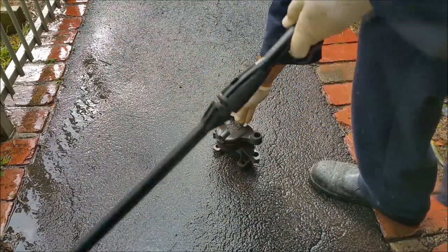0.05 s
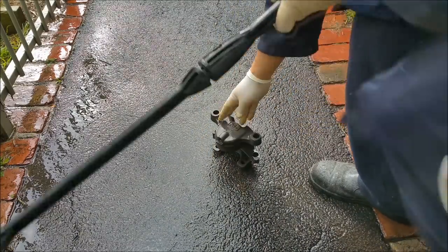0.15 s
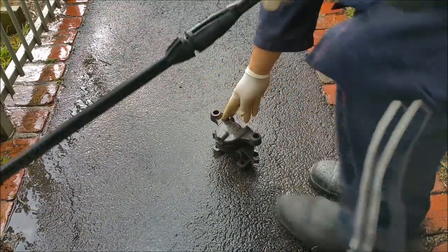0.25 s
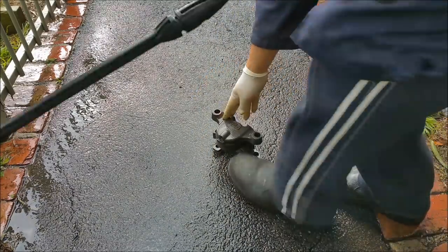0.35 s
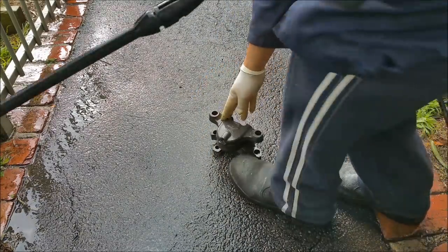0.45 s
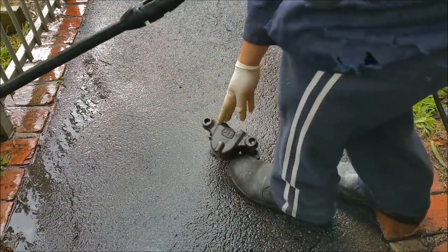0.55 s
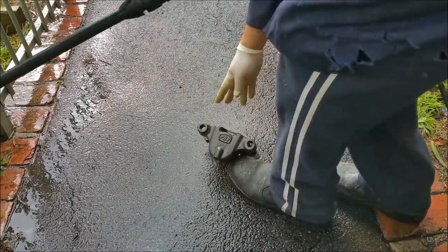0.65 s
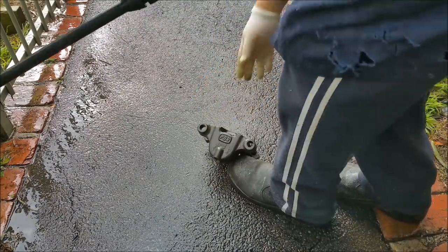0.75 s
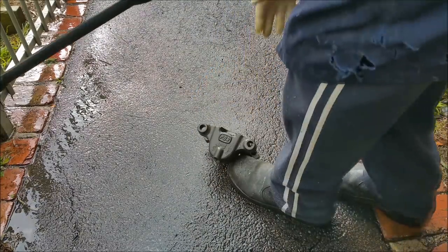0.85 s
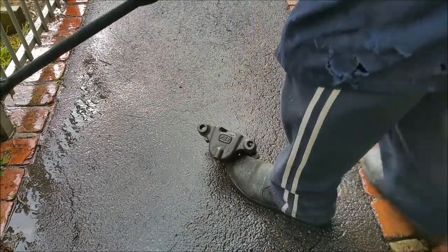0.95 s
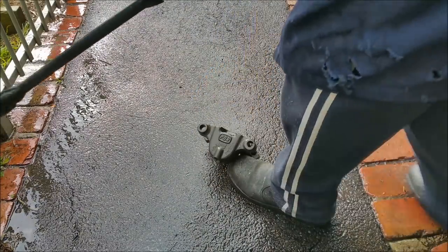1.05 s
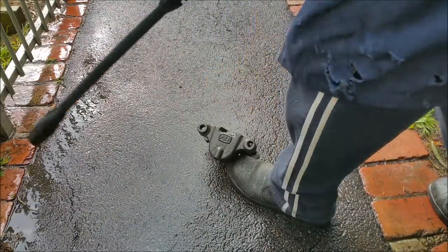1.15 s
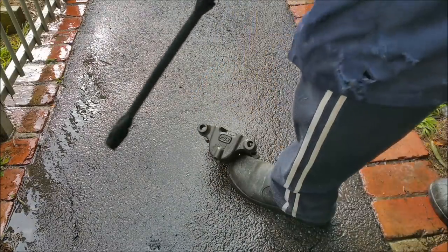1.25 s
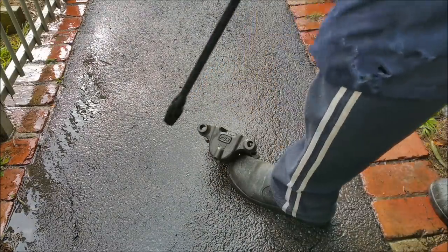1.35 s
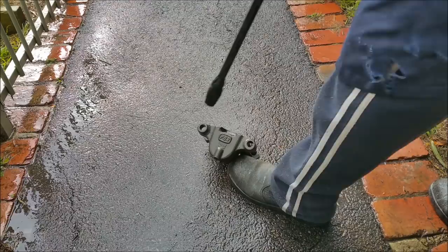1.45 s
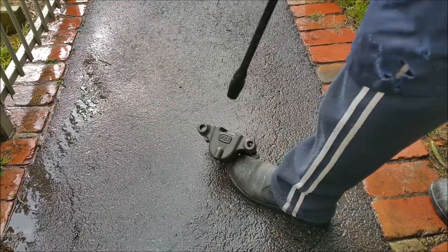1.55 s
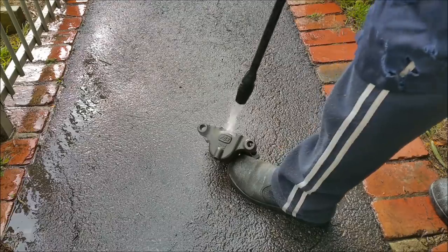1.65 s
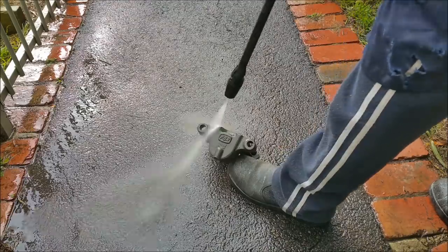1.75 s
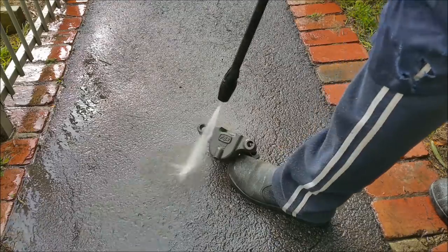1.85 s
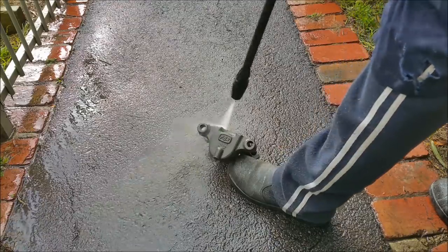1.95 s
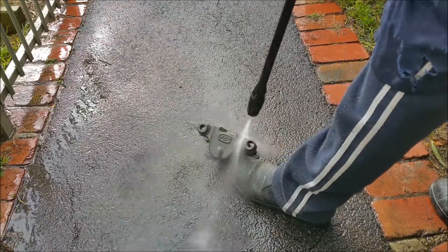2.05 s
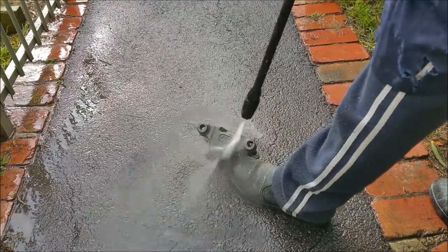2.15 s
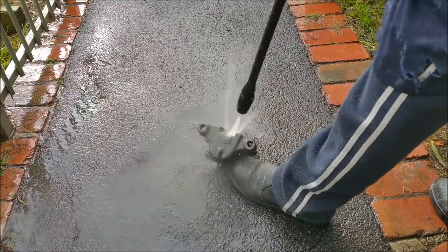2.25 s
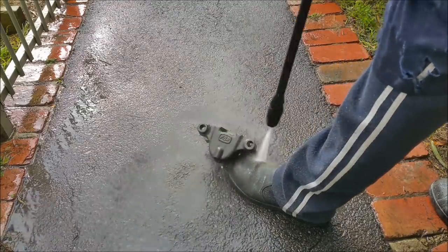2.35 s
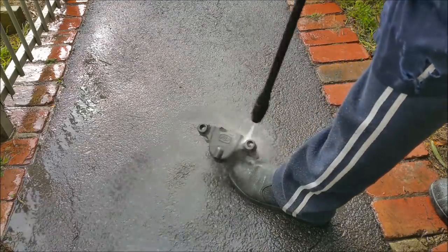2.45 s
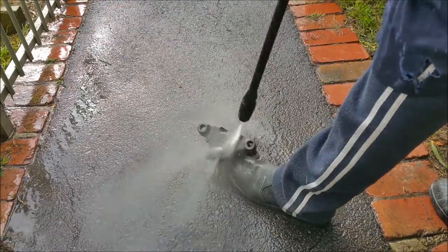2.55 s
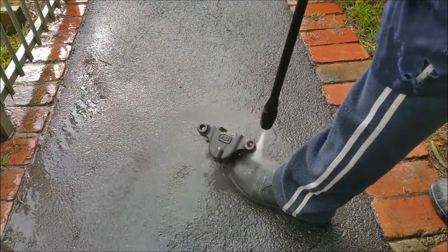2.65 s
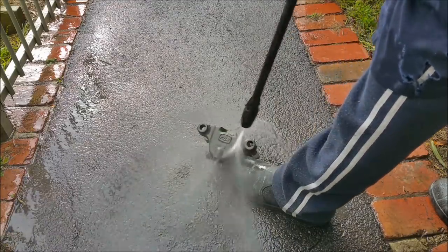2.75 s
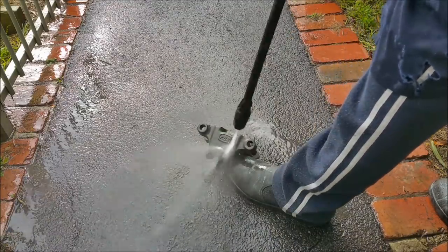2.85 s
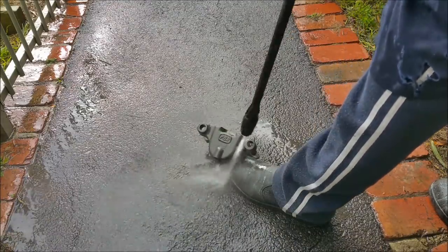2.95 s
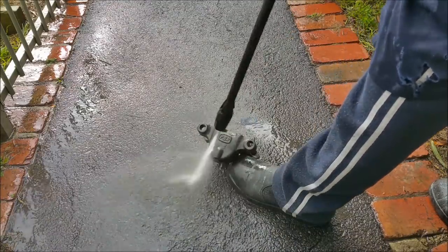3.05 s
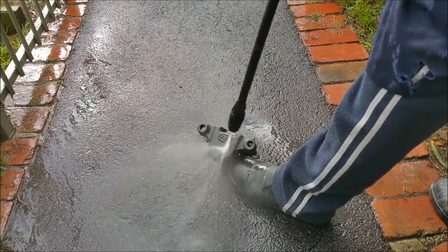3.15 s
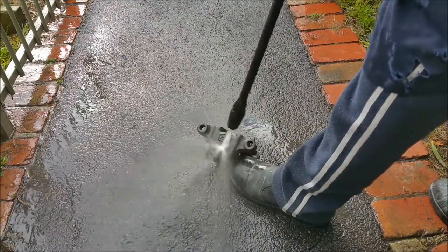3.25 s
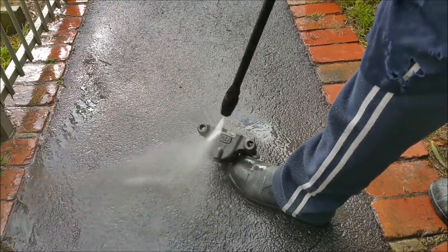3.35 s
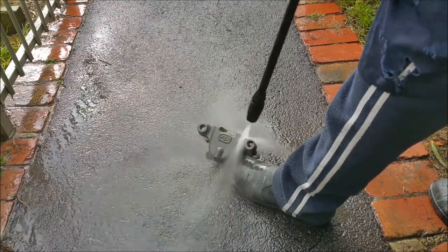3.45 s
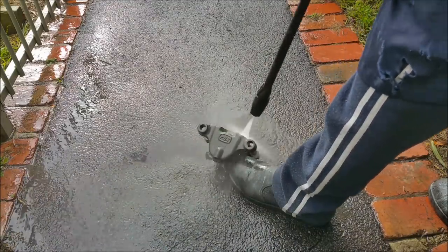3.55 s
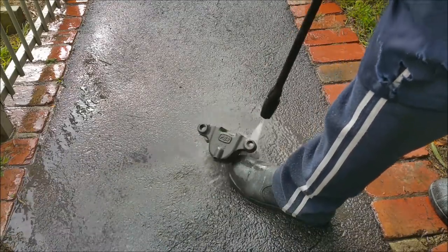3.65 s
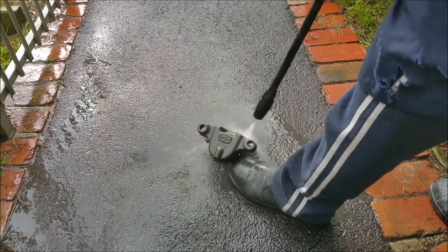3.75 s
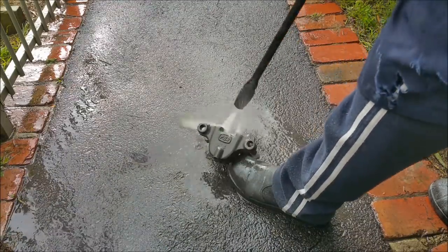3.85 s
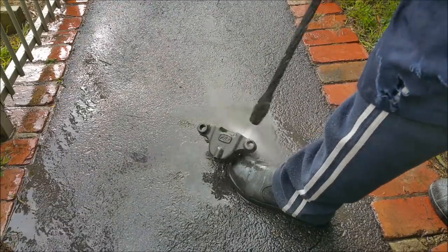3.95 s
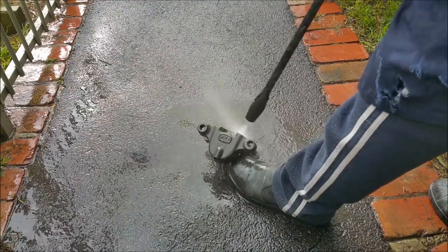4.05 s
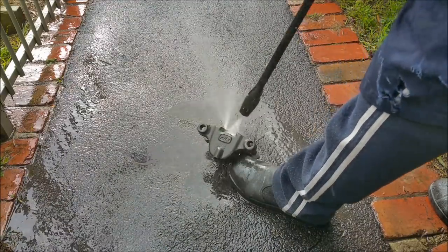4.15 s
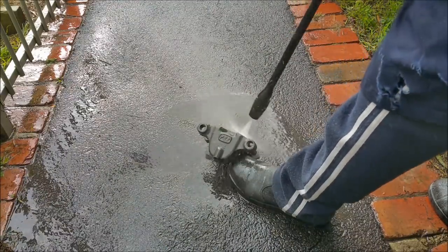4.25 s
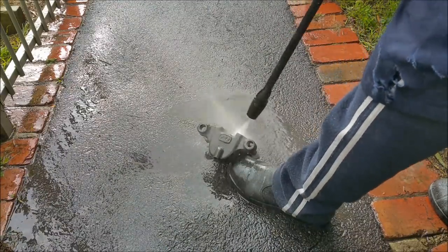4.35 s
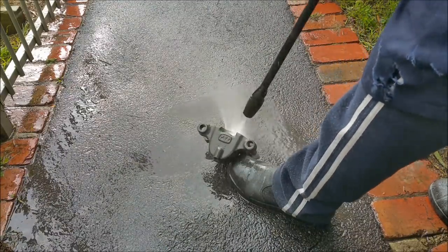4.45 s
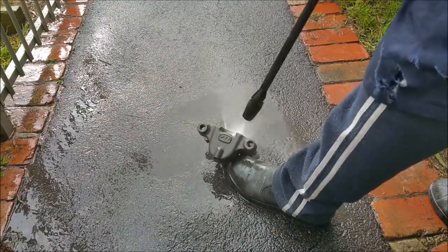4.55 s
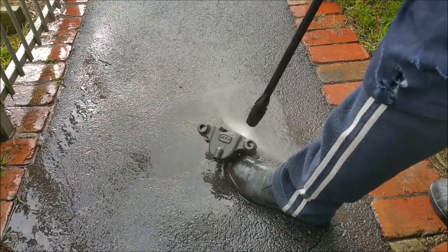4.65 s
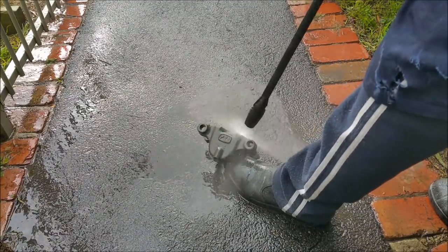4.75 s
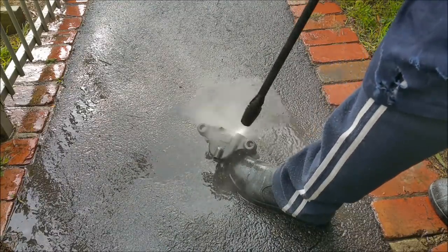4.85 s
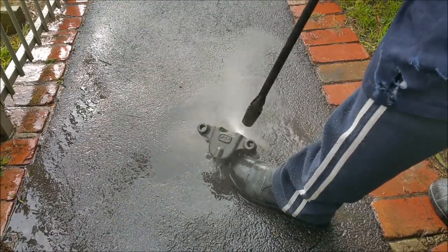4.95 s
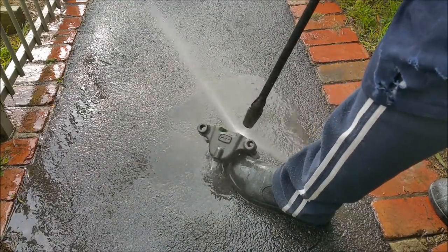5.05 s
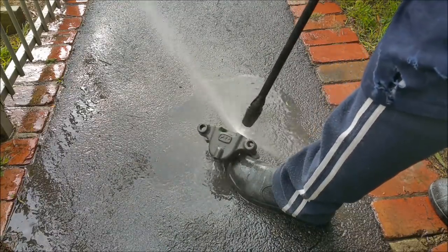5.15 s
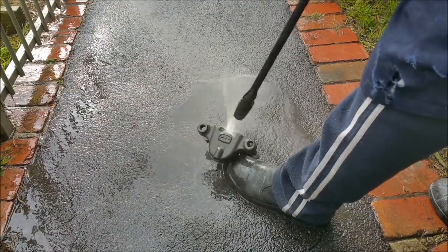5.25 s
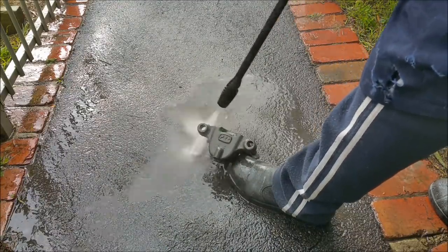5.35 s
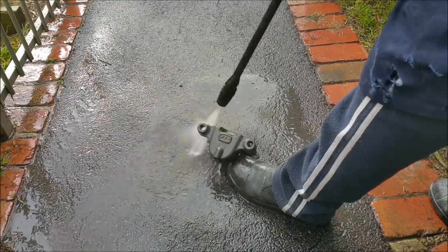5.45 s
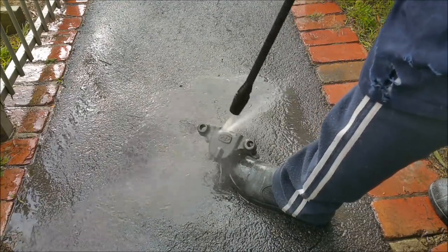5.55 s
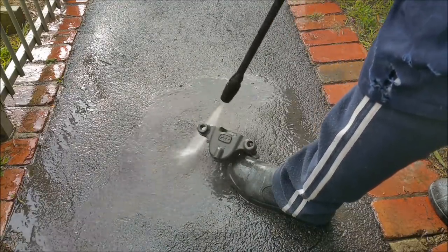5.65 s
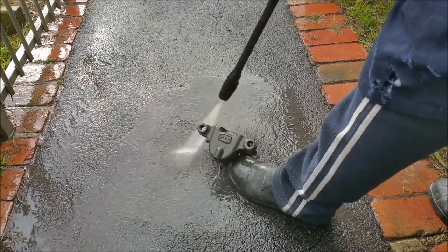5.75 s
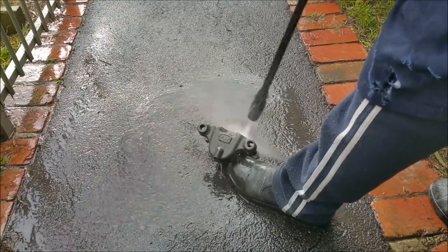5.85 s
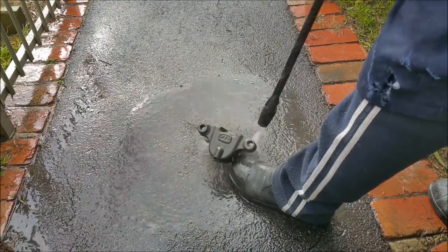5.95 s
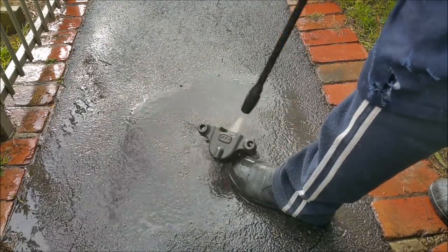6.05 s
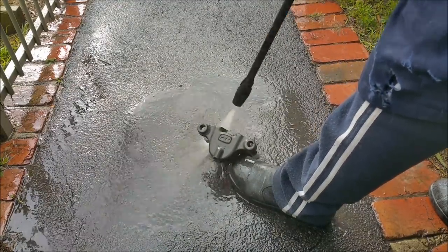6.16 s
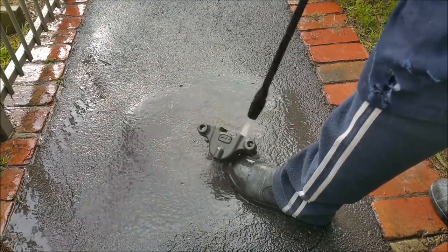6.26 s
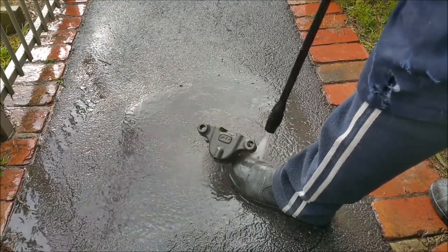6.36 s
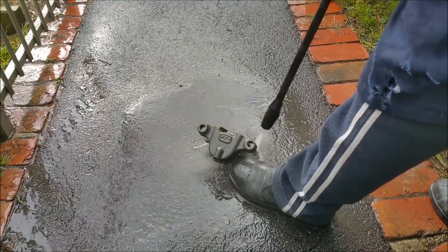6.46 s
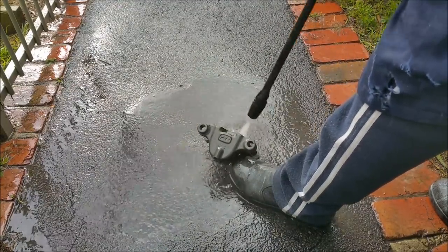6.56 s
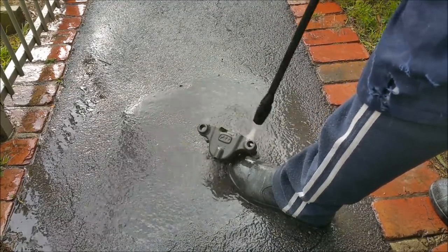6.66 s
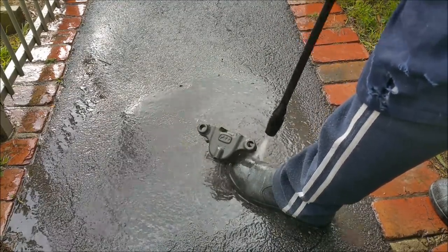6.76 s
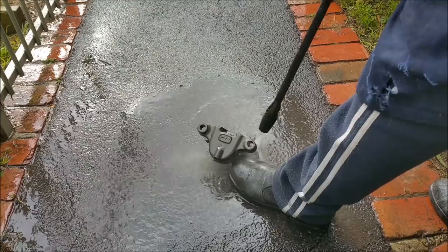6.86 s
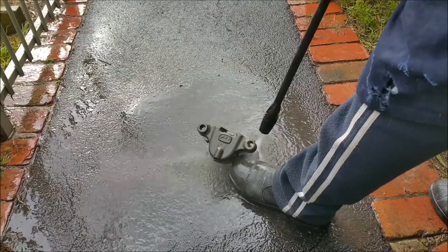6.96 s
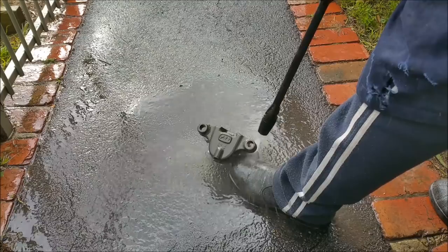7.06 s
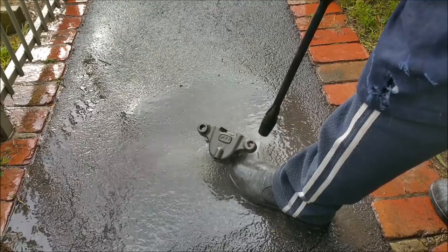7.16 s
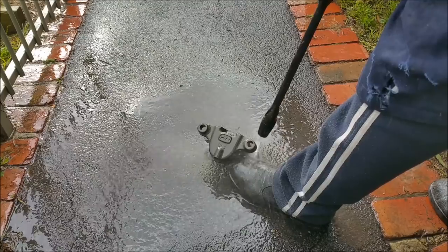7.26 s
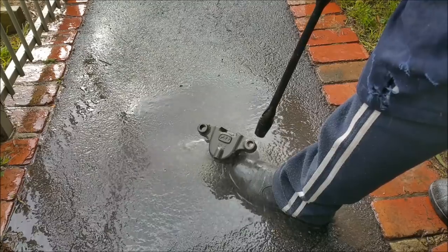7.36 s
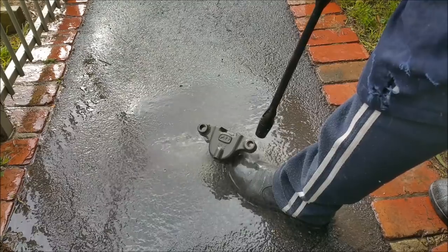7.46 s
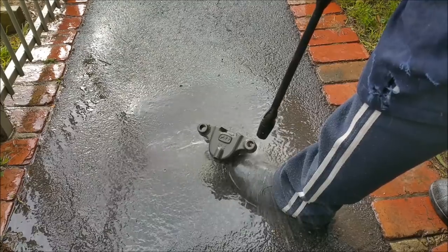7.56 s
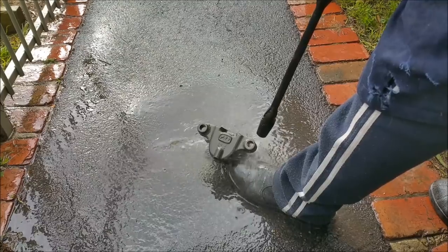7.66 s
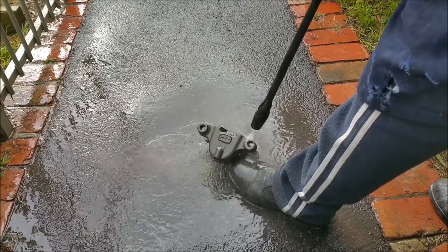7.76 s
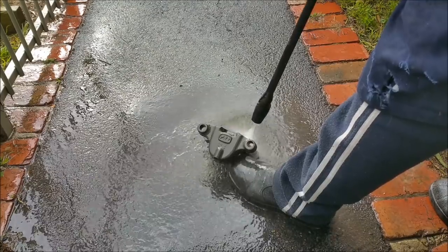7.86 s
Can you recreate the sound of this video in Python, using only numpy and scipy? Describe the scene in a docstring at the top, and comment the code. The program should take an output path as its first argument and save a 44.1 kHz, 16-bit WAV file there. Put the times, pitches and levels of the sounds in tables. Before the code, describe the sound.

Quiet outdoor air opens the scene, with a few faint, distant bird whistles during the first second and a half. From about 0.5 to 0.8 seconds a cast metal part is set down on wet asphalt in a quick cluster of thuds and short ringing clinks. Rubber boots scuff on grit, with one sharper tap near 1 second. At 1.7 seconds a pressure washer starts with a sudden spit, and its pump spins up to a steady hum off to the left, easing a little after 3.4 seconds. The water jet hisses continuously to the end, with a low drumming on boot and ground that gradually fades. It surges into rasps and hollow roars as it catches the metal's edges, around 2 to 3 and 3.6 to 4.7 seconds, then repeatedly from 5.5. From about 6.9 to 7.9 seconds it sputters on a bolt hole.

```python
"""Faint birds whistle over steady outdoor air. A cast metal part is set down on wet asphalt and nudged by
a boot: each impact thuds and excites the metal's damped modes. At 1.7 s a pressure washer starts. Off to
the left its pump spins up and hums in harmonics of the shaft rate. Its jet, a broadband noise source,
hisses over the part, drums on the rubber boot and surges in resonance whenever it catches a hollow or
an edge of the casting. In the last second it sputters on a bolt hole."""
import sys
import numpy as np
from scipy import signal
from scipy.fft import rfft, irfft, next_fast_len
from scipy.io import wavfile
from scipy.ndimage import uniform_filter1d, map_coordinates

SR = 44100
rng = np.random.default_rng(int(sys.argv[2]) if len(sys.argv) > 2 else 0)


def persist_wave(psi):
    """Save psi, clipped to +-1, as 16-bit WAV."""
    counts = np.round(np.clip(psi, -1, 1) * 32767).astype(np.int16)
    wavfile.write(sys.argv[1], SR, np.atleast_2d(counts).T)


N = 349272
TOP_HZ = 15850  # upper edge of the band

# rotation of the pump's shaft: t/s, f/Hz
SHAFT_RATE = [(1.76, 38), (1.8, 50), (1.85, 62), (1.9, 72), (1.96, 77), (2.05, 79.2), (2.3, 77.7),
              (3.0, 77.6), (4.55, 77.7), (5.0, 78.5), (5.8, 78.9), (7.9, 79.3)]
# spectrum of the spray: f/Hz, level/dB
SPRAY_SPECTRUM = [(200, -31), (600, -8), (1500, 7), (3000, -1.5), (4200, 3), (5300, 4), (6000, -0.5),
                  (7600, -5.5), (10200, 0), (12500, -2), (15700, -3.5)]


def amp(db):
    """Amplitude ratio of a level in decibels."""
    return 10 ** (np.asarray(db) / 20)


def unit(x):
    """Normalisation to rms 1."""
    return x / np.sqrt(np.mean(x ** 2) + 1e-20)


def along(points, hz):
    """Interpolation of (f/Hz, value) points on a logarithmic frequency axis."""
    f, values = np.transpose(points)
    return np.interp(np.log(hz + 1), np.log(f + 1), values)


def curves(rows):
    """Linear interpolation in time: one value per sample for each column after t/s."""
    times, *columns = np.transpose(rows)
    return [np.interp(np.arange(N) / SR, times, column) for column in columns]


def wobble(rate):
    """Random modulation: a spline through `rate` Gaussian knots a second."""
    return map_coordinates(rng.standard_normal(int(N * rate / SR) + 4), [np.arange(N) * rate / SR])


def filtered(x, response):
    """Linear filtering: the spectrum of x times a complex frequency response."""
    size = next_fast_len(N + SR // 2)
    return irfft(rfft(x, size) * response(np.fft.rfftfreq(size, 1 / SR)), size)[..., :N]


def colour(points):
    """Magnitude response through (f/Hz, level/dB) points."""
    return lambda hz: amp(along(points, hz))


def resonance(f, centre, width):
    """Band-pass response of a damped oscillator."""
    return 1j * f * width / (centre ** 2 - f ** 2 + 1j * f * width)


def cavity(modes):
    """Incoherent sum: separately excited resonances add in power."""
    return lambda f: np.sqrt(sum(np.abs(amp(db) * resonance(f, hz, width)) ** 2 for hz, width, db in modes))


def add(track, start_s, sound):
    """Superposition of a sound on a track."""
    part = track[..., max(round(start_s * SR), 0):][..., :sound.shape[-1]]
    part += sound[..., :part.shape[-1]]


def rush(response, grain_db=0, grain_rate=1000, coherence=None):
    """Partly coherent stereo noise of rms 1, modulated into grains; compact sources are more coherent."""
    # default likeness at the two microphone ports: f/Hz, coherence (clipped to 0-1)
    port_coherence = [(40, 0), (200, 1.96), (1400, -1.8), (3200, 0.35), (7000, 0.37), (15000, 0.4)]

    def mid_and_side(hz):
        alike = along(port_coherence, hz) if coherence is None else np.full_like(hz, coherence)
        turn = np.arccos(np.clip(alike, 0, 1)) / 2
        return response(hz) * [np.cos(turn), np.sin(turn)]

    grains = rng.standard_normal((2, N)) * amp(grain_db * wobble(grain_rate))
    mid, side = filtered(grains, mid_and_side)
    return unit(np.array([mid + side, mid - side]))


def outdoor_air(level_db=-55, sway_db=0.8):
    """Ambient noise, strongest at low frequencies, with slight amplitude modulation."""
    # spectrum of the air: f/Hz, level/dB
    spectrum = [(15, -42), (25, -8), (54, -2.5), (79, -1.5), (115, -4), (154, -6), (1210, -15),
                (1810, -23.5), (2070, -20), (15000, -40)]
    return amp(level_db + sway_db * wobble(5.03)) * rush(colour(spectrum))


def birds():
    """Distant whistles: gliding tones, blurred by random frequency modulation."""
    # calls: t/s, duration/s, start f/Hz, end f/Hz, relative level/dB
    calls = [(0.0, 0.14, 3630, 3530, -67), (0.42, 0.1, 2020, 1870, -66), (0.87, 0.15, 1130, 1170, -66),
             (1.025, 0.19, 1290, 1280, -66), (1.478, 0.069, 2200, 1880, -65)]
    song = np.zeros(N)
    for start, length, start_hz, end_hz, db in calls:
        progress = np.linspace(0, 1, int(length * SR))
        hz = (start_hz + (end_hz - start_hz) * progress) * (1 + .03 * wobble(386)[:len(progress)])
        add(song, start, amp(db + 4) * np.sin(np.pi * progress) * np.sin(2 * np.pi * np.cumsum(hz) / SR))
    return song


def yard_echo(x, t60=0.49, delay_s=0.008):
    """Reverberation: reflections from fence and walls form a dull, exponentially decaying tail."""
    t = np.arange(SR // 2) / SR
    tail = rng.standard_normal((2, len(t))) * amp(-60 * t / t60) * (t > delay_s)
    wet = signal.fftconvolve(x, tail / np.linalg.norm(tail[0]), axes=1)[:, :N]
    return filtered(wet, colour([(400, -8), (3000, -14), (12000, -14)]))


def boots():
    """Friction and impact noise: rubber soles scuff and tap on wet grit."""
    # scuffs and taps: t/s, level/dB, rise/s, T60/s
    scuffs = [(0.159, -41.5, .005, .22), (0.475, -48, .012, .12), (0.826, -47, .002, .06),
              (0.967, -27, .004, .055), (0.99, -39.5, .006, .11), (1.218, -43, .016, .35)]
    # spectrum of a sole on grit: f/Hz, level/dB
    sole_spectrum = [(60, 10), (200, 4.5), (800, 1.5), (1500, -4), (2600, -12), (5000, -16), (7000, -33),
                     (15000, -27)]
    t, envelope = np.arange(SR // 2) / SR, np.zeros(N)
    for start, db, rise, t60 in scuffs:
        add(envelope, start, amp(db - 60 * t / t60) * (1 - np.exp(-t / rise)))
    return envelope * rush(colour(sole_spectrum), grain_db=2.5, grain_rate=900)


def clank(t, weight, rattle, stiffening=0.079, detune=0.0076, bright_db=8, slip_rate=600, slip_t60=0.092):
    """Modal ringing, re-excited by slips on grit; resting weight damps, detunes and raises the modes."""
    # modes of the casting: f/Hz, level/dB, T60/s before the cap and the damping by weight
    modes = [(1954, -8, 0.55), (2360, 4, 0.062), (3170, -18, 1.1), (3900, -4.5, 0.095), (4610, -8, 0.3),
             (5300, -18, 0.23), (5615, -20, 0.16), (6000, -22, 0.26), (6891, -31, .3), (7197, -33, 0.24),
             (8543, -39, 0.24), (9400, -32, 0.25)]
    tinkle = [(hz, -35, 0.24) for hz in rng.uniform(11000, TOP_HZ, 9)]  # new high modes at each contact
    hz, level_db, t60 = np.transpose(modes + tinkle)[:, :, None]
    strength, shift, left, right = rng.standard_normal((4, len(hz), 1))
    octaves = np.log2(np.minimum(hz, 9000) / 2500)
    hz = hz * (1 + weight * (stiffening * np.minimum(2500 / hz, 1) ** 2 + detune * shift))
    loaded_t60 = np.minimum(t60, .24) / (1 + 1.4 * weight)
    # hard grit under the settled part excites the higher modes
    level_db = level_db + (-1.5 + 3 * weight) * strength + bright_db * weight * octaves
    fade = amp(level_db - 60 * t / loaded_t60)
    phase = 2 * np.pi * hz * t + 0.65 * np.array([left, right])
    ring = (fade * np.sin(phase)).sum(axis=1) / np.linalg.norm(fade[:, 0])
    crunch = signal.lfilter(*signal.butter(2, 5500, fs=SR), rng.standard_normal((2, len(t))))
    crack = amp(-25 + 12 * weight - 60 * t / 0.05) * crunch
    strike = (ring + crack) * (1 - np.exp(-t / 0.00041))
    slips = (rng.random(len(t)) < slip_rate / SR) * rng.standard_normal(len(t))
    force = (t == 0) + rattle * slips * amp(-60 * t / slip_t60)
    return signal.fftconvolve(strike, force[None] / np.linalg.norm(force), axes=1)[:, :len(t)]


def casting():
    """Impact excitation: each contact drives a heavily damped thud on the asphalt and rings the metal."""
    # contacts: t/s, relative thud level/dB, relative ring level/dB, resting weight (0-1), rattle (0-1)
    contacts = [(0.501, -37, -46, 0, .1), (0.509, -31, -29, 0.01, 0.25), (0.528, -38, -43, .06, 0.4),
                (0.533, -44, -48, 0.23, 0), (0.588, -37, -39.5, .3, .25), (0.676, -45, -43, .3, .7),
                (0.693, -43, -39, 0.44, 0.7), (0.725, -43, -35, .7, .6), (0.7318, -29, -43, .9, .3),
                (0.742, -38, -52, .9, .4), (0.763, -33.5, -43, 0.9, 0), (0.784, -43, -40, 1, 0.1)]
    # modes of the knock on asphalt: f/Hz, bandwidth/Hz, level/dB
    thud_modes = [(120, 37, -2), (201, 37, 3.5), (307, 82, 2.5), (425, 163, -2), (755, 234, -8.5)]
    t = np.arange(SR // 2) / SR
    metal, blows = np.zeros((2, N)), np.zeros((2, N))
    for start, thud_db, ring_db, weight, rattle in contacts:
        add(metal, start, amp(ring_db + 4.5) * clank(t, weight, rattle))
        # one push, then grit crushing under the edge
        push = (t == 0) + 0.032 * amp(-60 * t / 0.17) * rng.standard_normal((2, len(t)))
        add(blows, start, amp(thud_db + 47) * push)
    thuds = filtered(blows, lambda f: sum((-1) ** k * amp(db) * resonance(f, hz, width)
                                          for k, (hz, width, db) in enumerate(thud_modes)))
    return metal + thuds


def pump(shaft_angle, housing_hz=788, housing_width_hz=20, housing_db=8, left_lead_s=0.00038):
    """Forced vibration: shaft harmonics over fan noise, each swelling near the housing's resonance."""
    # strength of the hum: t/s, piston throb level/dB, motor whine level/dB
    hum_levels = [(1.77, -50, -55), (1.89, -30, -35), (2.0, -26, -35), (2.15, -26, -36), (2.35, -25.5, -44),
                  (3.38, -25.5, -44), (3.48, -35, -41), (4.05, -35, -40), (4.5, -33.5, -37),
                  (5.3, -33, -35), (6.3, -33, -34), (7.9, -36.5, -36)]
    # harmonics, three piston strokes a turn: shaft order, level/dB, share following the motor (0-1)
    harmonics = [(1, -26.5, 0), (2, -29, 0), (3, -13.5, 0), (4, -16, .2), (5, -11.5, .5), (6, -9.5, .15),
                 (7, -10, .6), (8, -6, .6), (9, 2, .9), (10, -4, 1), (12, -4, .8), (13, 0, 1),
                 (22, -2.5, 1), (23, -7, 1), (26, -3.5, 1)]
    # spectrum of the motor's fan: f/Hz, level/dB
    fan_spectrum = [(150, -51), (450, 9.5), (750, -20), (1200, 19.5), (1800, 2), (2600, -43), (6000, -35)]
    piston_db, whine_db = curves(hum_levels)
    shaft_hz, = curves(SHAFT_RATE)
    hum = amp(-35) * (shaft_hz / shaft_hz.max()) ** 4 * rush(colour(fan_spectrum), coherence=0.75)
    for order, db, motor_share in harmonics:
        drive_db = piston_db + motor_share * (whine_db - piston_db)
        boost_db = housing_db * np.exp(-((order * shaft_hz - housing_hz) / housing_width_hz) ** 2)
        level_db = drive_db + db + boost_db + 1.9 * wobble(5)
        phase = order * shaft_angle + rng.uniform(0, 2 * np.pi) + 0.011 * order * wobble(22)
        hum += np.sqrt(2) * amp(level_db) * np.sin(phase)
    # the earlier arrival on the left places the machine there
    return filtered(hum, lambda hz: np.exp(np.array([[1j], [-1j]]) * np.pi * hz * left_lead_s))


def tremor():
    """Random modulation by the hand that shakes the lance."""
    return wobble(24)


def bolt_hole(rough_db=2):
    """Cavity resonance: the jet lingers at the bolt hole, which sputters in narrow bands."""
    # resonances of the hole: f/Hz, nominal bandwidth/Hz, level/dB
    modes = [(2650, 490, 2.5), (3370, 230, -4), (4920, 380, -5)]
    # the jet on the hole: t/s, level/dB
    blowing = [(6.75, -70), (6.88, -25.5), (7.12, -22.5), (7.52, -23.5), (7.76, -20.5), (7.92, -40)]
    blow_db, = curves(blowing)
    voices = sum(amp(db + tremor()) * rush(lambda f: resonance(f, hz, 1.5 * width) ** 2, coherence=0.56)
                 for hz, width, db in modes)
    return amp(blow_db) * unit(voices * amp(rough_db * wobble(150)))


def edge_rasp(focus_hz, spread_octaves=0.72):
    """Flow-excited resonance: water tears over edges and holes; those under the jet sound the most."""
    # resonances of the edges: f/Hz, nominal bandwidth/Hz, level/dB
    modes = [(1764, 440, 2), (2110, 590, 0), (2850, 590, 0.5), (3410, 500, -0.5), (4050, 310, -4),
             (4830, 380, -6)]
    shares = np.array([np.exp(-(np.log2(hz / focus_hz) / spread_octaves) ** 2) * amp(db)
                       for hz, _, db in modes])
    shares /= np.linalg.norm(shares, axis=0)
    # squaring a resonance steepens its sides
    voices = [rush(lambda f: resonance(f, hz, 2.04 * width) ** 2, coherence=0.79) for hz, width, _ in modes]
    return sum(share * voice for share, voice in zip(shares, voices)) * unit(amp(1.3 * wobble(600)))


def surges(flow_db, face_hz=3270, enter_s=0.018, leave_s=0.044, arch_db=3):
    """Power addition of the wash on flat faces and each catch: roar gain, rasp gain, rasp centre/Hz."""
    # the jet catches a hollow or an edge: t/s, duration/s, roar level/dB, rasp level/dB, rasp f/Hz
    catches = [(1.894, 0.1, -32, -44, 3000), (2.017, 0.13, -28.5, -33, 2200), (2.145, 0.47, -41, -27, 2720),
               (2.237, 0.021, -27, -18.5, 2500), (2.444, 0.033, -19, -18.5, 2420),
               (2.494, 0.063, -28, -28, 2540), (2.564, 0.039, -22.5, -17.5, 2410),
               (2.64, 0.044, -44, -20.5, 2730), (2.747, 0.085, -24.5, -23, 2200),
               (2.836, 0.032, -23.5, -23, 2300), (3.03, 0.11, -27.5, -24, 3200),
               (3.198, 0.062, -27.5, -39, 3500), (3.63, .2, -28.5, -25, 2670),
               (3.766, 0.06, -21, -19, 2270), (3.818, 0.085, -20.5, -19, 2630),
               (3.912, .12, -31, -28, 2680), (4.098, 0.073, -25.5, -28.5, 2000),
               (4.343, 0.42, -44, -24, 3540), (5.473, 0.031, -28, -24.5, 2800),
               (5.588, 0.065, -26.5, -24, 2900), (5.768, 0.068, -21.5, -27, 2720),
               (5.867, 0.082, -21.5, -26.5, 3200), (6.025, 0.11, -24.5, -18, 2410),
               (6.18, 0.23, -24, -29, 2200), (6.439, 0.056, -27, -18, 2350), (6.493, 0.068, -28, -21, 2680),
               (6.561, 0.064, -26.5, -17, 2130), (6.655, 0.14, -25.5, -47, 2300),
               (6.813, 0.048, -31, -17.5, 2000), (6.87, 0.14, -33, -21.5, 2700),
               (6.951, 0.099, -24.5, -19, 2400), (7.063, 0.26, -29, -20.5, 2440),
               (7.31, 0.19, -28, -18.5, 2700), (7.502, 0.16, -27.5, -23.5, 2390),
               (7.618, 0.21, -30.5, -21, 2650), (7.808, 0.068, -26, -22, 2500)]
    t = np.arange(N) / SR
    roar_power, rasp_power = amp(flow_db - 4.5) ** 2, amp(flow_db + 1) ** 2
    weighted_hz = rasp_power * face_hz
    for start, length, roar_db, rasp_db, hz in catches:
        inside = np.clip(.5 + np.minimum((t - start) / enter_s, (start + length - t) / leave_s), 0, 1)
        off_centre = np.minimum((2 * (t - start) / length - 1) ** 2, 1)
        inside *= amp(-arch_db * off_centre) ** 2  # weaker at the ends than in the middle
        roar_power += inside * amp(roar_db) ** 2
        rasp_power += inside * amp(rasp_db) ** 2
        weighted_hz += inside * amp(rasp_db) ** 2 * hz
    return np.sqrt(roar_power), np.sqrt(rasp_power), weighted_hz / rasp_power


def wandering_colour(x, depth_db):
    """Spectral modulation: the colour wanders as the jet meets new faces of the metal."""
    spectra = signal.stft(x, nperseg=1024)[2]
    patches = uniform_filter1d(rng.standard_normal(spectra.shape[1:]), size=7, axis=0)  # over frequency
    patches = uniform_filter1d(patches, size=14, axis=1)  # over time
    return signal.istft(spectra * amp(depth_db * unit(patches)), nperseg=1024)[1][:, :N]


def jet(shaft_angle, age, build_s=0.15, slack_db=8):
    """Broadband excitation: water hisses as pressure builds, drums, and drives the casting's resonances."""
    # strength of the spray: t/s, relative level/dB
    flow = [(1.9, -29.5), (2.27, -28.5), (2.54, -30.5), (2.69, -28.5), (2.81, -28), (2.89, -27.5),
            (3.89, -29), (3.98, -28), (4.62, -29.5), (4.92, -28.5), (5.65, -28.5), (5.7, -27.5),
            (5.77, -29.5), (5.97, -29.5), (6.51, -30.5), (7.92, -29.5)]
    # drumming on boot and ground: t/s, level/dB
    drum_levels = [(1.75, -40), (1.84, -36.5), (2.1, -31.5), (3.36, -35), (3.46, -39.5), (4.65, -43),
                   (6.24, -40.5), (7.91, -59)]
    # spectrum of the drumming: f/Hz, level/dB
    drum_spectrum = [(25, -32), (55, -12), (85, -7), (150, -7), (250, -2), (420, 4), (600, 4), (1200, -42),
                     (4000, -60)]
    # resonances of the casting's hollows: f/Hz, bandwidth/Hz, level/dB
    hollows = [(662, 186, -1.5), (914, 180, 0.5), (1100, 215, -5.5)]
    flow_db = curves(flow)[0] - slack_db * np.clip(1 - age / build_s, 0, 1)
    drum_db, = curves(drum_levels)
    roar_gain, rasp_gain, focus_hz = surges(flow_db)
    spray_gain = amp(flow_db + 8.5 + 0.98 * tremor())
    spray = spray_gain * rush(colour(SPRAY_SPECTRUM), grain_db=1.0, grain_rate=2200)
    roar = roar_gain * rush(cavity(hollows), grain_db=0.5, grain_rate=400, coherence=0.64)
    metal = amp(0.72 * tremor()) * (roar + rasp_gain * edge_rasp(focus_hz) + bolt_hole())
    drumming = amp(drum_db) * rush(colour(drum_spectrum), grain_db=0.5, grain_rate=400)
    throb = 1 + 0.013 * np.sin(shaft_angle)
    return throb * wandering_colour(spray + metal + drumming, depth_db=1.4)


def washer(trigger_s=1.739, spit_t60=0.066, groan_delay_s=0.1, groan_width_s=0.027):
    """Starting transient: stored pressure spits out, and the sixth shaft harmonic swells briefly as it sweeps
    through a resonance of the pump's body while pump and jet set in."""
    shaft_angle = 2 * np.pi * np.cumsum(curves(SHAFT_RATE)[0]) / SR
    age = np.maximum(np.arange(N) / SR - trigger_s, 0)
    spit = amp(-11.5 - 60 * age / spit_t60) * rush(colour(SPRAY_SPECTRUM))
    swell = np.exp(-((age - groan_delay_s) / groan_width_s) ** 2)
    groan = amp(-31.5) * swell * np.sqrt(2) * np.sin(6 * shaft_angle)  # twice the piston rate
    onset = 1 - np.exp(-age / 0.0065)
    return onset * (pump(shaft_angle) + jet(shaft_angle, age) + spit + groan)


def scene():
    """Superposition: handling with its echo, then washing, over birds and outdoor air."""
    handling = casting() + boots()
    return outdoor_air() + handling + amp(-2.5) * yard_echo(handling) + birds() + washer()


def record(dry):
    """Transfer function of two microphone ports: level and phase differences, then a steep low-pass."""
    # level difference, left minus right: f/Hz, level/dB
    tilt = [(350, 2), (550, -0.5), (1300, 2.5), (4200, 1.5), (5300, 4), (6200, -6), (6900, -7.5),
            (7700, -.5)]
    # phase lead of the left port: f/Hz, phase/rad
    lead = [(200, -0.14), (4000, -0.07), (5000, 0.6), (6100, -3), (8200, 1.05)]
    sides = np.array([[1], [-1]]) / 2
    ports = lambda hz: amp(sides * along(tilt, hz)) * np.exp(1j * sides * along(lead, hz))
    low_pass = lambda hz: 1 / (1 + (hz / TOP_HZ) ** 240)
    return filtered(dry, lambda hz: ports(hz) * low_pass(hz))


dry = scene()
out = record(dry)
persist_wave(out)
```